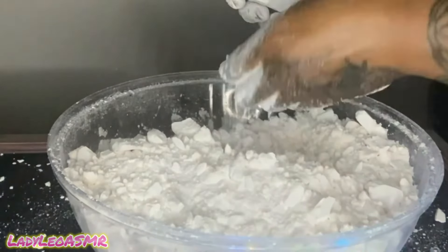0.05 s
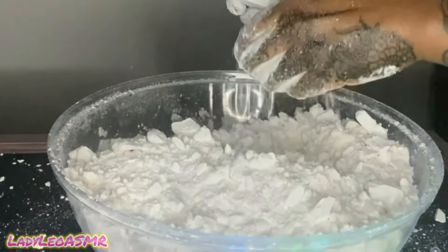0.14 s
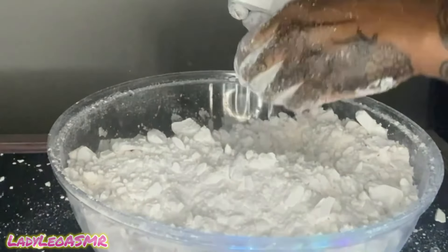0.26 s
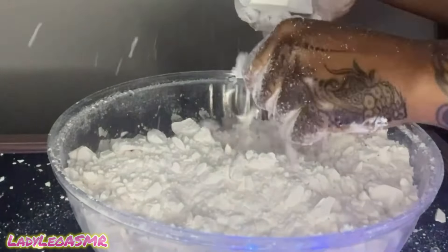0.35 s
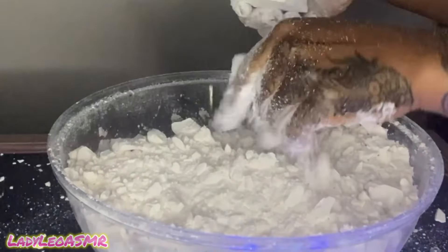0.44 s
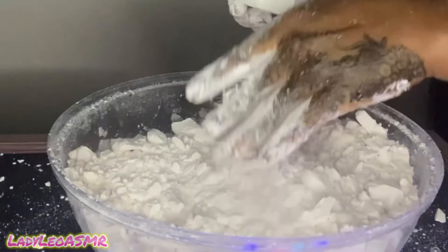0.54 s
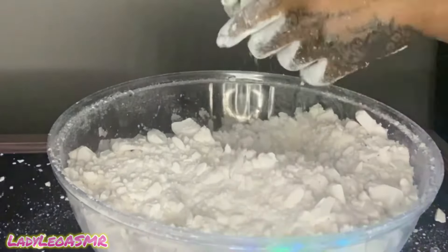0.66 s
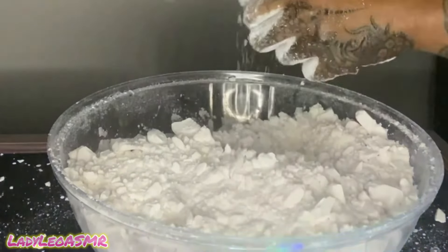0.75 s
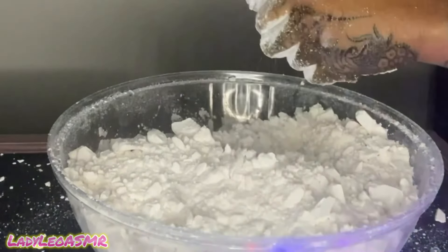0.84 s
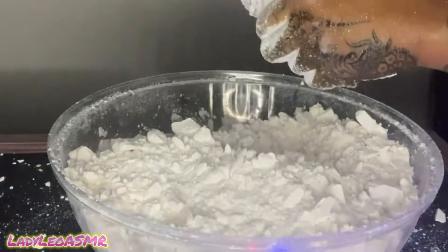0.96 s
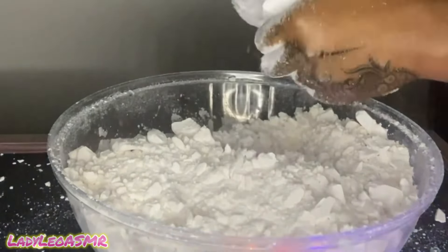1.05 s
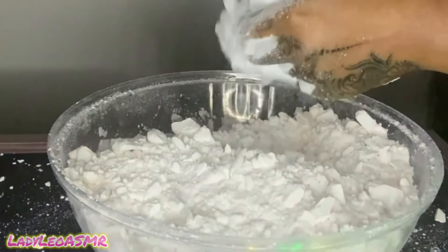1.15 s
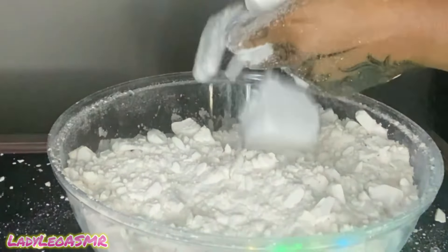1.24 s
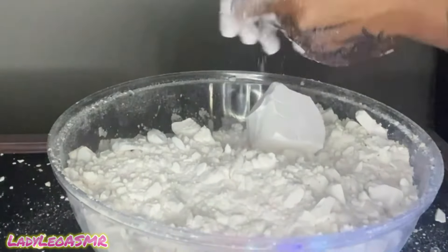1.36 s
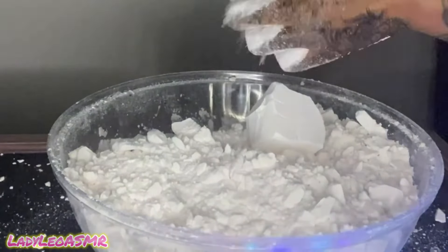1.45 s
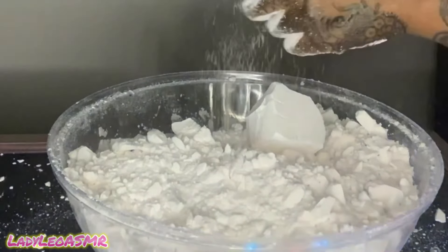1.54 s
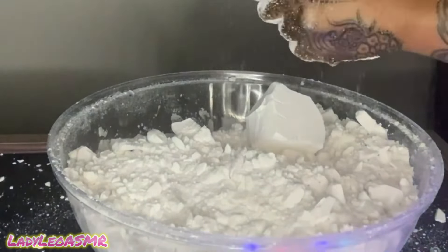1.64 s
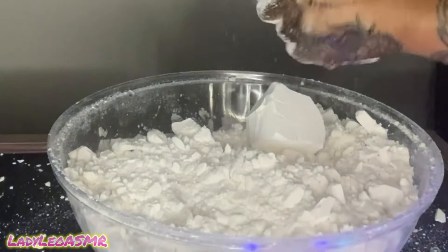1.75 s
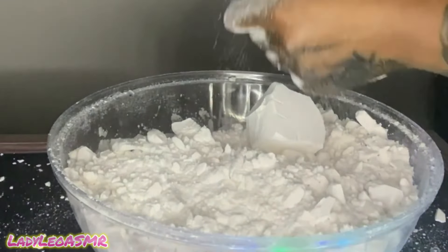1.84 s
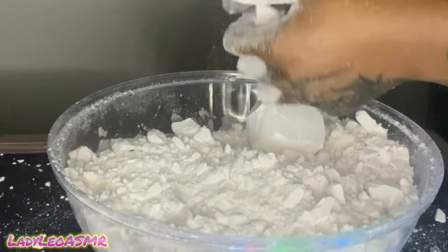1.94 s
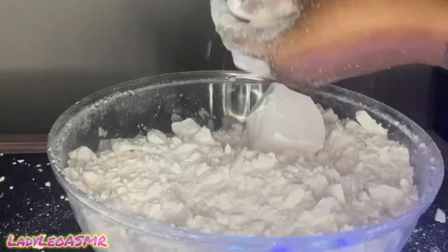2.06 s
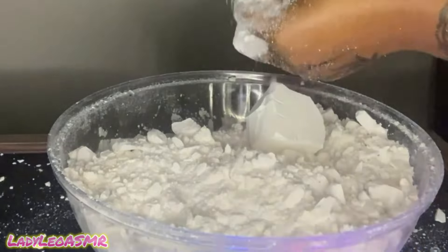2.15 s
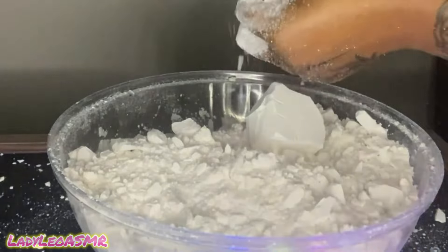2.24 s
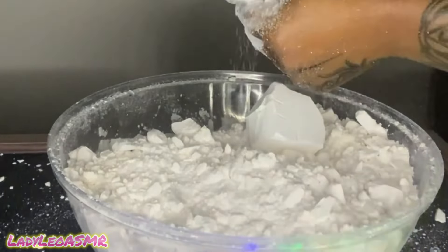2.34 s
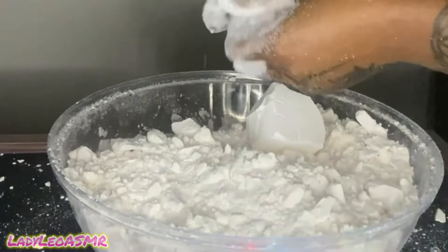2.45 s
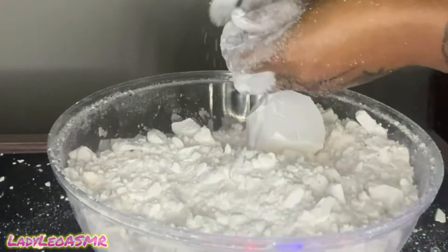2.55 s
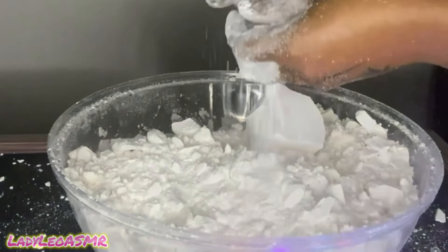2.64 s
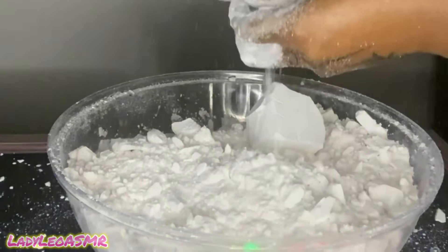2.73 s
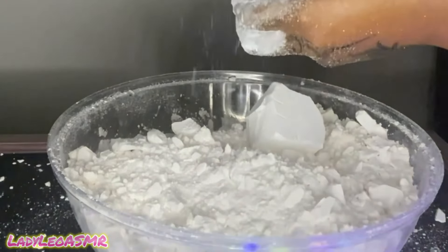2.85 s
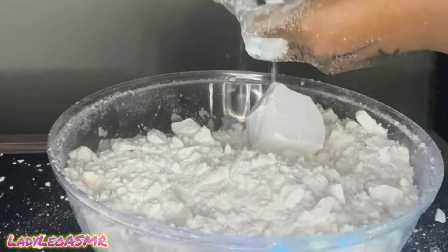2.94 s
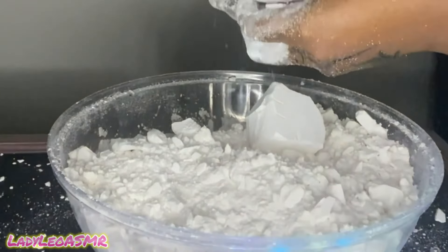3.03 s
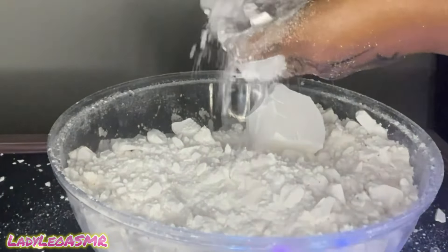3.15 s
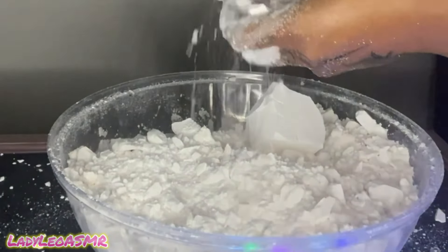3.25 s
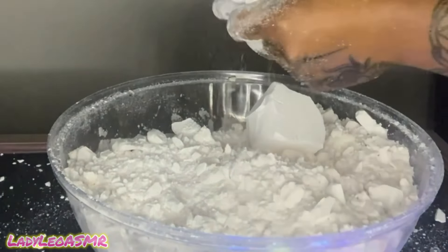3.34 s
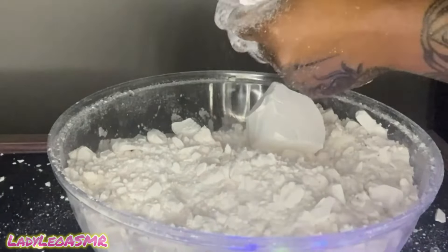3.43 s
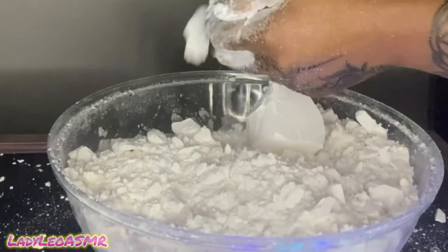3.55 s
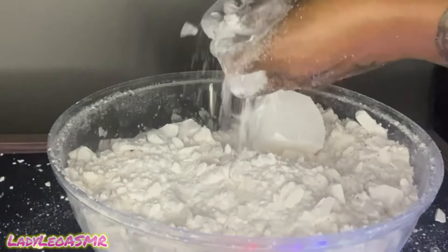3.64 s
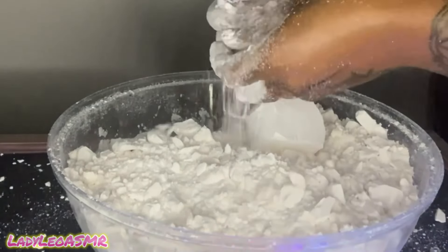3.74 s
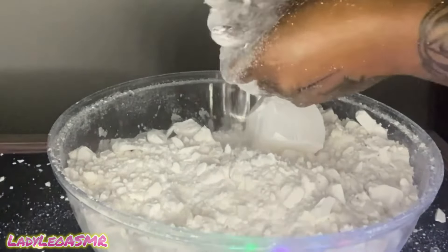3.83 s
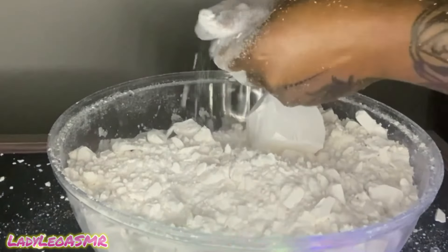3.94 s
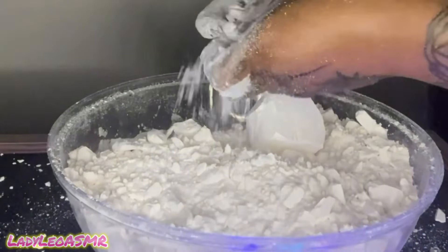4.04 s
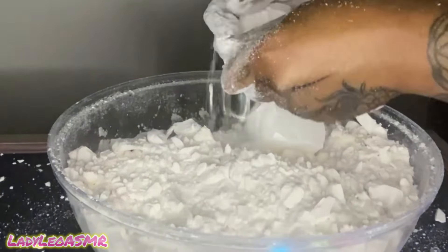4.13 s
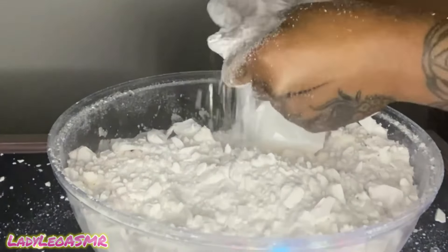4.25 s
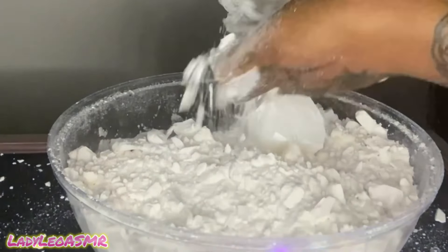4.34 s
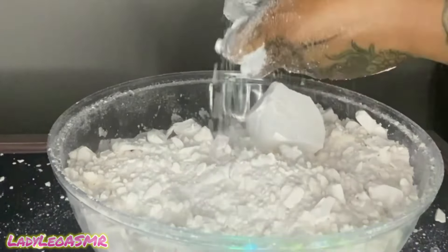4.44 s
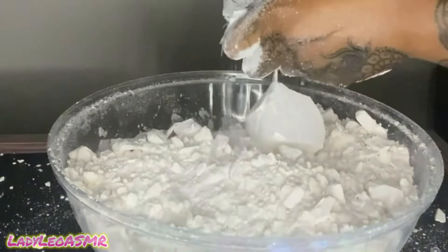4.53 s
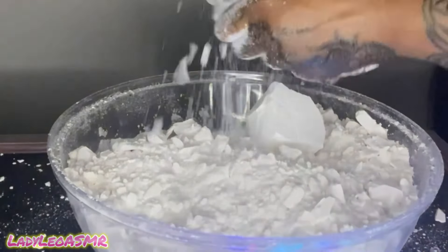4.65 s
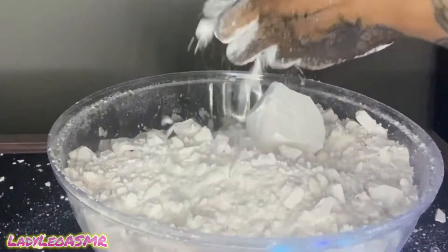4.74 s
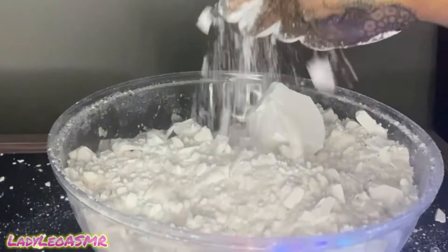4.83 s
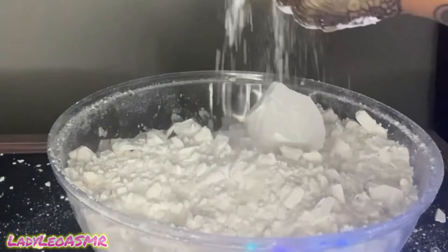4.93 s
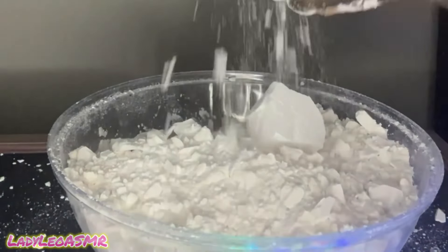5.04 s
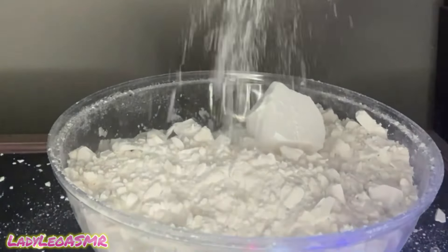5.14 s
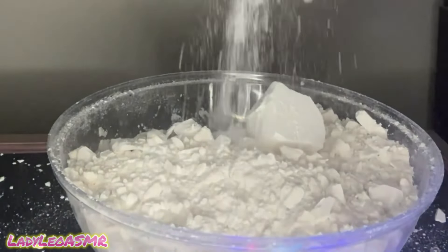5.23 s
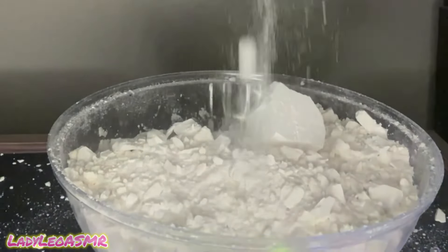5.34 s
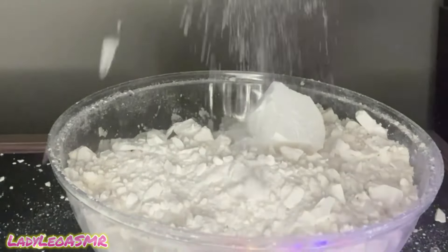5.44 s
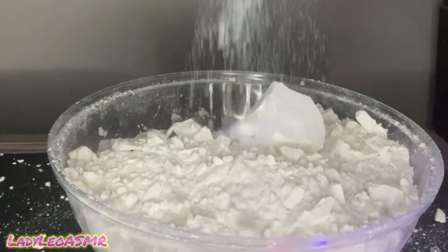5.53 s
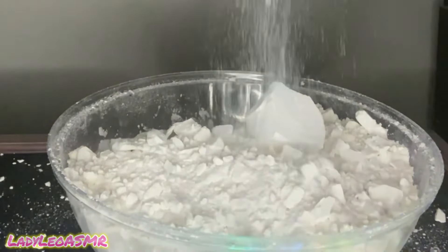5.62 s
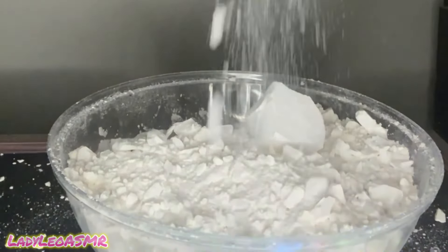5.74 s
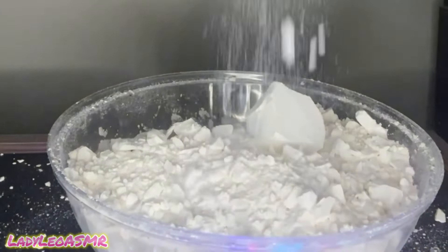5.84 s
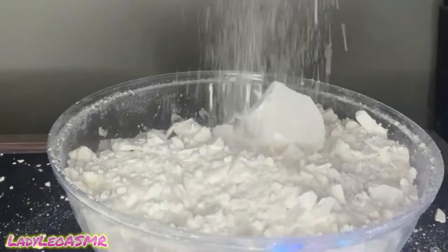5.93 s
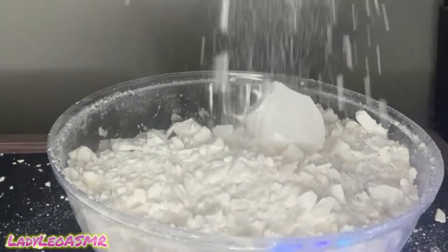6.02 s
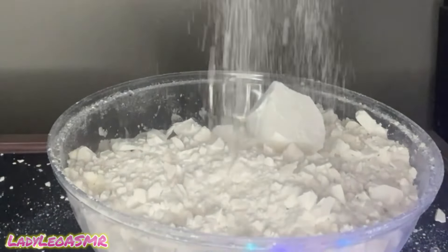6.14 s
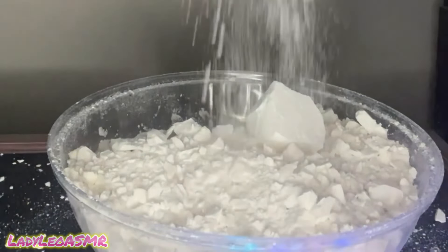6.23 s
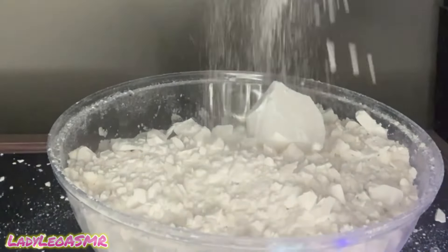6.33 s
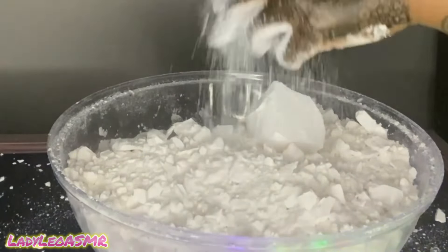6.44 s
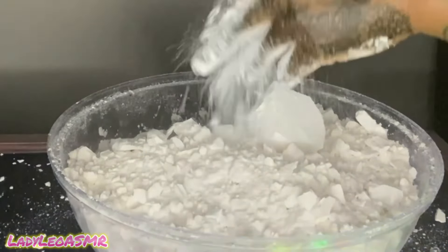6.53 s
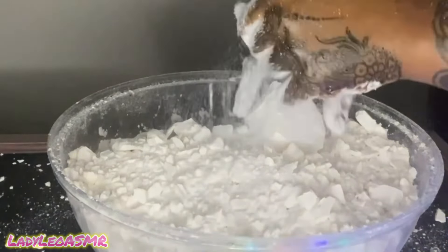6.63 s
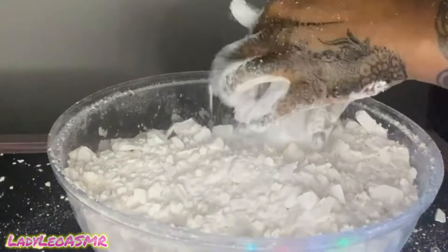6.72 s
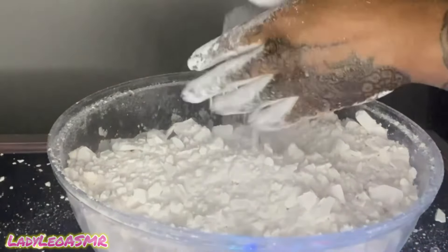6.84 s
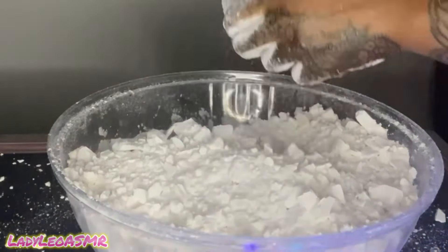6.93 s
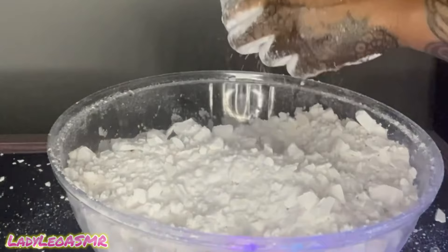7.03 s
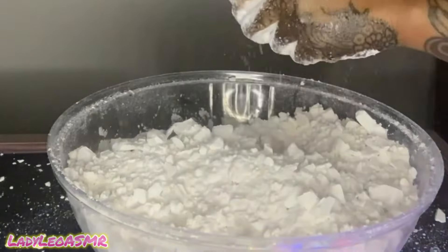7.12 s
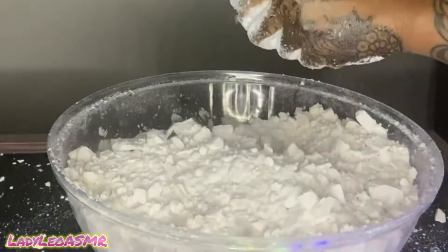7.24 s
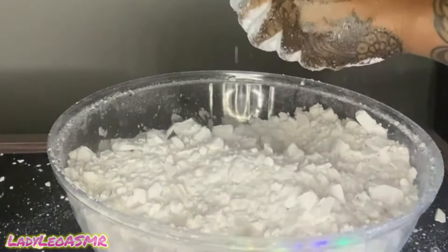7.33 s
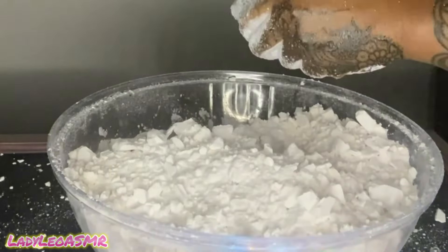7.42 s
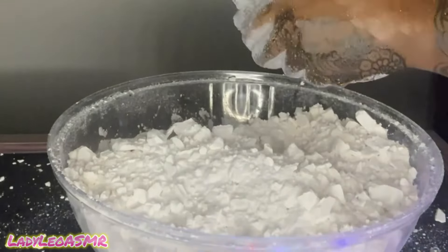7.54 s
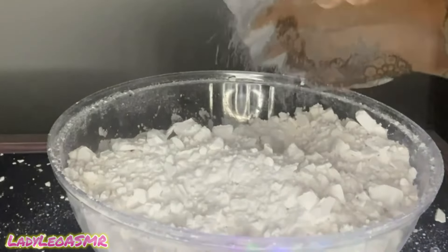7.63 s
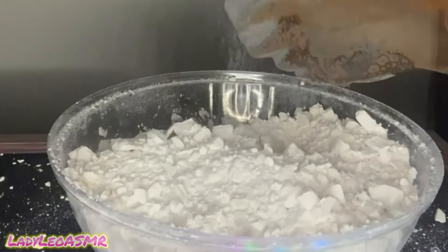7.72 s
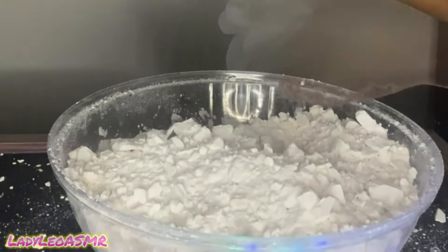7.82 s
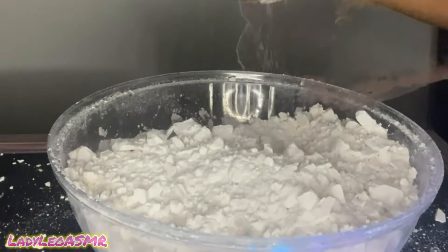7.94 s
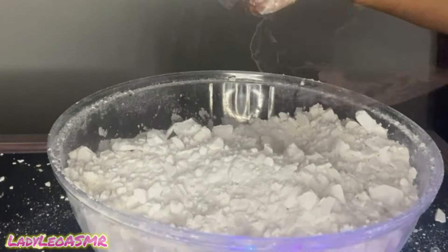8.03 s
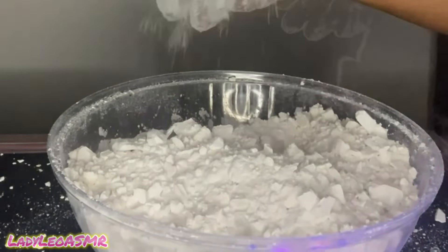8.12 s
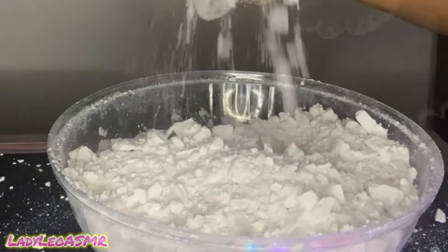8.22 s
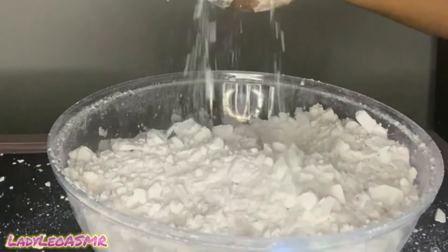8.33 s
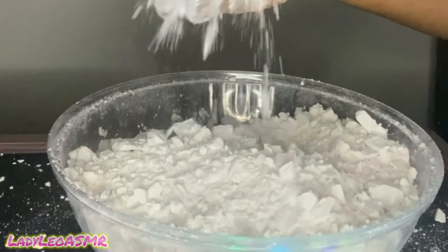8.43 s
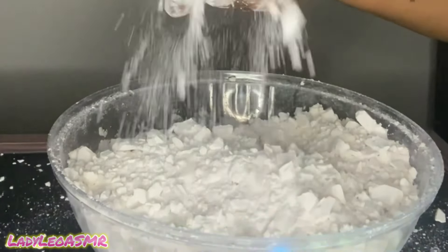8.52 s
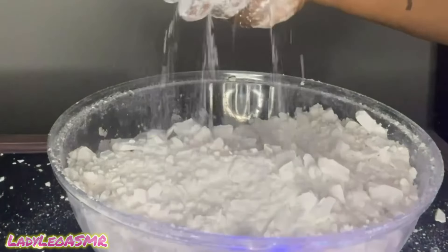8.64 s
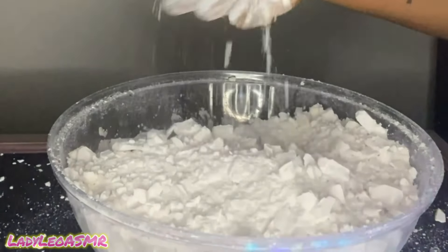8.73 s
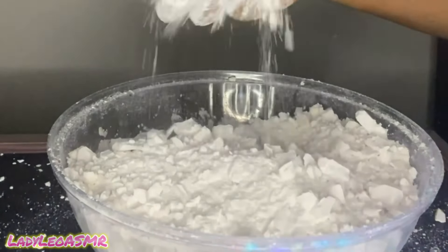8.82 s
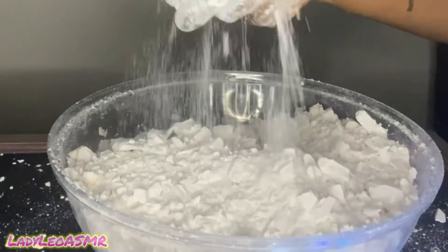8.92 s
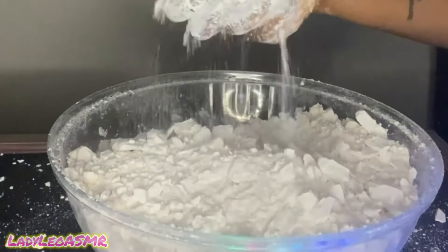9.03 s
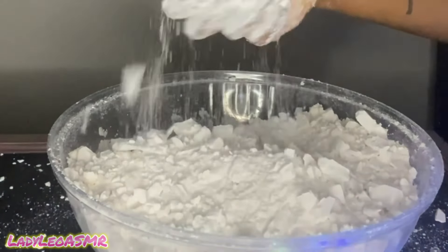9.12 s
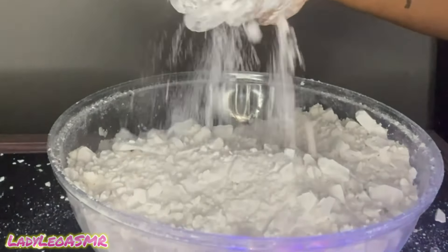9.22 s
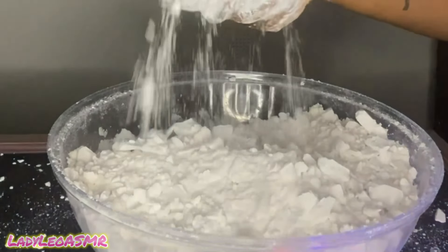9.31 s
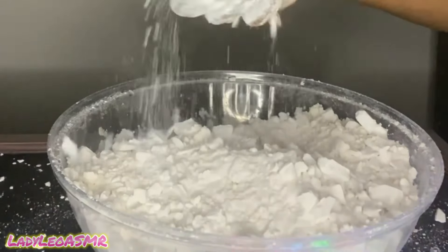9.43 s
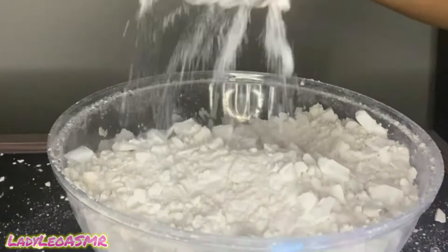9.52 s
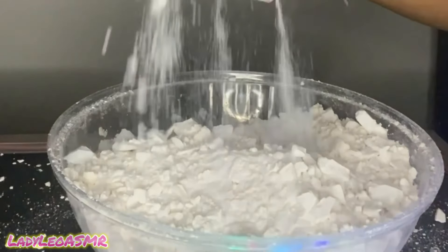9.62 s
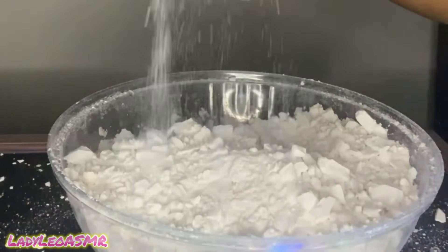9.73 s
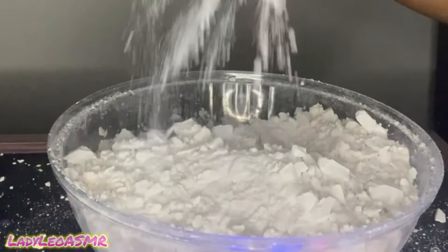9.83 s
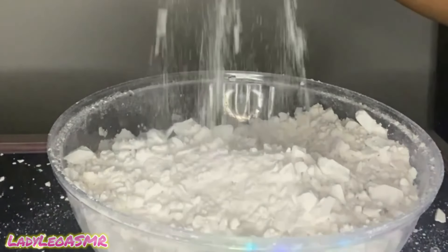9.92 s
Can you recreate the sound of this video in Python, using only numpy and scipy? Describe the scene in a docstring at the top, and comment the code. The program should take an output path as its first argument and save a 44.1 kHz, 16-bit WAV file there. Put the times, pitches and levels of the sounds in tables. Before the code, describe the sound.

Soft chalk blocks crack sharply and grind to powder between someone's hands, heard up close in a small room. Twice a block knocks hollowly in the plastic bowl below, and each time loud splintering snaps follow, then uneven crunching, a powdery hiss and the ticks of falling pieces. The two rounds are split by a brief quiet pause, with a low rumble underneath throughout.

```python
"""Crushing chalk over a bowl

Hands snap and crush soft chalk blocks over a plastic bowl, close to a stereo microphone in a small room.
Each break is a sharp crack with a short splintering tail; each squeeze grinds out grit and dust.
Pieces clink in the bowl, the bowl rings along and the room answers every crack.
A low rumble and a faint hiss lie under it all."""
import sys
import numpy as np
from scipy import signal
from scipy.fft import rfft, irfft
from scipy.io import wavfile

SR = 44100
rng = np.random.default_rng(int(sys.argv[2]) if len(sys.argv) > 2 else 0)


def generate_wav(sig):
    """Save sig (samples, or channels by samples) to the path in sys.argv[1] as 16-bit PCM at SR."""
    pcm = np.round(np.clip(np.atleast_2d(sig).T, -1, 1) * 32767).astype(np.int16)
    wavfile.write(sys.argv[1], SR, pcm)


N = 439677


def amp(db):
    """Turns decibels into a gain."""
    return 10 ** (np.asarray(db) / 20)


def lean_left(db):
    """Two gains that make the left side db louder than the right."""
    return amp([[db / 2], [-db / 2]])


def unit_power(x):
    """Scales a sound to an average power of 1."""
    return x / np.sqrt(np.mean(x ** 2) + 1e-20)


def at_hz(points, hz):
    """Reads between the rows of a table, giving every octave equal room."""
    points = np.array(points)
    return np.interp(np.log(hz), np.log(points[:, 0]), points[:, 1])


def drift(rate_hz):
    """A slow random wander, about 1 in size."""
    r = np.exp(-80 * np.pi * rate_hz / SR)
    slow = signal.lfilter([1], [1, -2 * r, r * r], rng.standard_normal(N // 40 + 2002))[2000:]
    return np.interp(np.arange(N) / 40, np.arange(len(slow)), unit_power(slow))


def filtered(x, hz, kind="low", order=2):
    """Keeps what lies below one pitch or, with "band", between two."""
    return signal.sosfilt(signal.butter(order, hz, kind, fs=SR, output="sos"), x)


def peak_filter(hz, width_hz):
    """The filter numbers for a resonance with gain 1 at its top."""
    r = np.exp(-np.pi * width_hz / SR)
    gain = (1 - r * r) / 2
    return [gain, 0, -gain], [1, -2 * r * np.cos(2 * np.pi * hz / SR), r * r]


def resonate(x, hz, width_hz):
    """Makes a sound ring near one pitch by passing it twice through a resonance."""
    b, a = peak_filter(hz, width_hz)
    return signal.lfilter(b, a, signal.lfilter(b, a, x))


# How alike the two sides sound. Each row: pitch in Hz, likeness (1 the same, -1 opposite).
STEREO_LIKENESS = [(25, 1), (60, 0.94), (130, 0.95), (300, 0.13), (640, -0.69), (1500, -0.4), (3000, -0.16),
                   (7000, 1), (11000, 0.067), (12400, -0.35)]

def colour(mid, side, spectrum, wide=1.0):
    """Mixes two noises into left and right and gives them the tone of a spectrum table."""
    size = N + 1323
    hz = np.maximum(np.fft.rfftfreq(size, 1 / SR), 1)
    alike = np.clip(1 - wide * (1 - at_hz(STEREO_LIKENESS, hz)), -1, 1)
    gain = amp(at_hz([(5, -80)] + spectrum + [(20000, -80)], hz))
    mid = np.sqrt(1 + alike) * rfft(mid, size)
    side = np.sqrt(1 - alike) * rfft(side, size)
    return unit_power(irfft(gain * np.array([mid + side, mid - side]))[:, :N])


# The rumble's tone. Each row: pitch in Hz, relative level in dB.
RUMBLE_TONE = [(14, -35.5), (25, -14.5), (45, -4.5), (60, 1), (80, -8.5), (110, -4.5), (180, -11),
               (290, -17), (370, -23.5), (500, -58.5)]
# The rumble's loudness. Each row: time in seconds, level in dB.
RUMBLE_LEVELS = [(0.0, -48.5), (1.02, -49.5), (1.14, -41.5), (1.28, -42), (1.36, -36.5), (1.55, -50),
                 (1.89, -48), (4.63, -48), (4.77, -45), (5.66, -48.5), (5.86, -43.5), (6.86, -48.5),
                 (8.52, -37), (8.83, -40), (9.97, -40)]

def rumble():
    """Low noise that swells now and then and wavers a little."""
    level_db = np.interp(np.arange(N) / SR, *np.transpose(RUMBLE_LEVELS)) + 0.8 * drift(5)
    return amp(level_db) * colour(*rng.standard_normal((2, N)), RUMBLE_TONE)


# The hiss's tone. Each row: pitch in Hz, relative level in dB.
HISS_TONE = [(250, -17), (400, 12), (1200, 5), (2000, -0.5), (3300, -4), (5500, -10.5), (8000, -20),
             (11800, -10), (12600, -50.5)]

def hiss(level_db=-57.5):
    """Faint, steady background noise."""
    return amp(level_db) * colour(*rng.standard_normal((2, N)), HISS_TONE)


def grains(per_s, spread_db, smooth):
    """Clumps of random clicks, very uneven in size, over a share of smooth noise."""
    sizes = amp(spread_db * np.minimum(rng.exponential(1, N), 5)) * rng.choice([-1, 1], N)
    clicks = rng.random(N) < per_s * amp(4.0 * drift(25)) / SR
    return unit_power(sizes * clicks) + smooth * rng.standard_normal(N)


# The hand squeezes or rubs. Each row: start in seconds, hold in seconds, grit in dB, dust in dB.
SQUEEZE_MOVES = [(0.21, 0.0056, -44, -50), (0.351, 0.067, -48, -45.5), (0.523, 0.11, -56.5, -47),
                 (1.154, 0.0092, -39, -46.5), (1.22, 0.064, -54, -55), (1.368, 0.031, -65, -48.5),
                 (1.507, 0.047, -68, -44.5), (1.857, 0.0062, -29.5, -45), (2.007, 0.1, -97, -47.5),
                 (2.176, 0.041, -53.5, -40.5), (2.289, 0.17, -41, -53), (2.55, 0.04, -52.5, -44.5),
                 (2.746, 0.012, -51, -40), (2.97, 0.013, -39, -40.5), (3.058, 0.055, -30.5, -38.5),
                 (3.308, 0.02, -36.5, -32), (3.409, 0.085, -40, -40.5), (3.7, 0.084, -47.5, -47),
                 (3.842, 0.094, -42, -44), (4.189, 0.14, -45, -44.5), (4.466, 0.26, -53.5, -49),
                 (4.673, 0.027, -31.5, -40), (4.921, 0.097, -37.5, -44.5), (5.147, 0.17, -49.5, -49),
                 (5.393, 0.077, -36, -37.5), (5.574, 0.042, -40, -38.5), (5.695, 0.26, -49.5, -47),
                 (6.045, 0.067, -45.5, -38), (6.193, 0.03, -45.5, -45.5), (6.331, 0.16, -51.5, -44),
                 (6.668, 0.19, -71.5, -52.5), (6.991, 0.011, -67, -46.5), (7.69, 0.007, -39.5, -48),
                 (7.917, 0.033, -37.5, -43), (8.007, 0.13, -39, -61), (8.204, 0.12, -41.5, -42.5),
                 (8.374, 0.045, -39.5, -37), (8.483, 0.069, -48, -57), (8.601, 0.19, -38.5, -42.5),
                 (8.818, 0.028, -46.5, -51), (8.954, 0.069, -46, -44), (9.092, 0.043, -37, -44),
                 (9.222, 0.072, -46.5, -44), (9.327, 0.12, -40.5, -40.5), (9.546, 0.11, -44, -52.5),
                 (9.724, 0.11, -47.5, -44), (9.909, 0.082, -43, -47)]

def squeezing(layer, rest_db, rise_db_per_s=370, fall_db_per_s=202):
    """Loudness of grit or dust: each squeeze swells, holds and dies away over a faint trickle."""
    t, power = np.arange(0, N + 64, 64) / SR, amp(2 * rest_db)
    for start, hold, grit_db, dust_db in SQUEEZE_MOVES:
        db = grit_db if layer == "grit" else dust_db
        before, after = np.maximum(start - t, 0), np.maximum(t - start - hold, 0)
        power = power + amp(2 * (db - rise_db_per_s * before - fall_db_per_s * after))
    return np.interp(np.arange(N) / SR, t, np.sqrt(power))


# The note of the hollow between the hands. Each row: time in seconds, pitch in Hz.
GRIP_PITCHES = [(0.0, 1303), (0.19, 3270), (0.36, 1520), (0.53, 3040), (1.25, 1710), (1.77, 1400),
                (2.25, 3540), (2.33, 2120), (2.64, 3190), (4.8, 2142), (4.89, 1140), (5.0, 2250),
                (6.58, 2140), (7.53, 1646), (8.39, 2900), (9.77, 1754), (9.97, 2100)]

def cupped_hands(x, width_share=0.4, peak_db=-0.5):
    """The hollow of the hands adds a resonance that moves as the grip shifts."""
    peak, state, block = np.zeros_like(x), np.zeros((2, 2)), 256
    for i in range(0, N, block):
        hz = np.interp(i / SR, *np.transpose(GRIP_PITCHES))
        b, a = peak_filter(hz, width_share * hz)
        peak[:, i:i + block], state = signal.lfilter(b, a, x[:, i:i + block], zi=state)
    return unit_power(x + amp(peak_db) * peak)


# The pitch in Hz of each size of crumb, from big to small.
CRUMB_PITCHES = [450, 750, 1150, 1500, 1850, 2000, 2150, 2350, 2900, 3400, 4000]

def crumbs(db_per_octave=-4):
    """Crumbs strike the heap at random and ring briefly; smaller ones are higher and weaker."""
    hits = grains(per_s=230, spread_db=2.1, smooth=0)
    sizes = rng.integers(0, len(CRUMB_PITCHES), N)
    left_db = rng.normal(0, 4.0, len(CRUMB_PITCHES))
    out = np.zeros((2, N))
    for k, hz in enumerate(CRUMB_PITCHES):
        ticks = resonate(hits * (sizes == k) + 1e-18, hz, 0.15 * hz)
        out += ticks * amp(db_per_octave * np.log2(hz / 2000)) * lean_left(left_db[k])
    return unit_power(out)


# The grit's tone. Each row: pitch in Hz, relative level in dB.
GRIT_TONE = [(300, -13.5), (700, -4), (1200, -3), (1650, -4.5), (2150, 0), (2650, -6), (4000, -3.5),
             (6000, -7)]

def grit(crumb_db=-17):
    """Coarse grains grind inside the hands while single crumbs drop."""
    grind = colour(grains(1200, 4.0, 1.0), grains(1200, 3.3, 0.7), GRIT_TONE, wide=0.7)
    return squeezing("grit", rest_db=-70) * (cupped_hands(grind) + amp(crumb_db) * crumbs())


# The dust's tone. Each row: pitch in Hz, relative level in dB.
DUST_TONE = [(2500, -17.5), (4500, -18), (6500, -14), (9000, -14.5), (11600, -14.5), (12400, -14),
             (16000, -17.5)]

def dust(flicker_db=3.2):
    """Fine powder hisses; the rubbing fingers shift, so each band swells and fades on its own."""
    powder = colour(grains(2500, 2.7, 0.75), grains(2500, 3.0, 0.8), DUST_TONE, wide=1.5)
    edges_hz = np.geomspace(2500, 17000, 6)
    # flipping every other band lets the bands join smoothly
    patchy = sum((-1) ** k * amp(flicker_db * drift(15)) * filtered(powder, band, "band")
                 for k, band in enumerate(zip(edges_hz, edges_hz[1:])))
    return squeezing("dust", rest_db=-63) * unit_power(patchy)


def splinters(t, fade_s, soft):
    """One sharp fracture, then many tiny breaks; also returns two smooth noises for the echoes."""
    noise = rng.standard_normal((3, len(t)))
    noise[0] *= np.abs(noise[0]) ** 0.49   # makes it spiky
    noise[0] *= amp(-60 * t / fade_s)
    swell_s = (0.04 if soft else 0.012) * fade_s
    noise[0] *= 1 - np.exp(-t / swell_s)
    noise = filtered(noise, 11800, order=10)
    if not soft:
        noise[0, 0] += 0.055 / fade_s   # the shorter the break, the harder its first click
    return noise


# The room's answer to a crack's ring, treble and thud. Each row: relative level in dB,
# fade time in seconds (a fade time is how long a 60 dB drop takes), stereo spread in dB.
ROOM_ANSWERS = [(10, 0.26, -2), (10.5, 0.15, -4), (12.5, 0.3, 0.5)]

def room_echo(t, part, mid, side, crack_fade_s, first_echo_s=0.0016):
    """Dense echoes, new for each crack as the hands move; longer splintering feeds the room more."""
    room_db, fade_s, side_db = ROOM_ANSWERS[part]
    echoes = unit_power(mid) + amp(side_db) * unit_power(side) * [[1], [-1]]
    arrival = np.clip(t / first_echo_s - 1, 0, 1)
    fed_db = -26.5 + 6 * np.log2(crack_fade_s / 0.02)
    return echoes * lean_left(2.4) * arrival * amp(fed_db + room_db - 60 * t / fade_s)


# Chalk breaks. Each row: start in seconds, level in dB, ring pitch in Hz,
# treble and thud in dB compared with the ring, fade time in seconds.
CHALK_BREAKS = [(0.189, -16, 2820, -2, -11, 0.026), (0.207, -20, 2370, 8, -7, 0.0092),
                (0.31, -22.5, 2880, -6, -5.5, 0.027), (0.327, -25, 1560, 5, 0.5, 0.024),
                (0.364, -31, 3200, -10, 5.5, 0.014), (0.597, -27.5, 2500, 8, -7.5, 0.013),
                (1.328, -21.5, 2800, 2, -6, 0.022), (1.82, -2, 1580, -1.5, -9, 0.017),
                (2.165, -31.5, 2570, 6.5, -14, 0.027), (2.302, -19.5, 3150, 1.5, -18, 0.012),
                (2.348, -26, 3000, -24, -15, 0.16), (2.358, 1, 1910, -7, -11, 0.012),
                (2.65, -40, 3700, 7, -34, 0.048), (2.737, -26.5, 2330, 4, -45, 0.025),
                (2.938, -19, 2730, -11.5, -10, 0.044), (2.963, -20.5, 2030, -3, -34, 0.025),
                (3.012, -5, 3220, -9, -11, 0.012), (3.043, -8.5, 2940, -2, -21, 0.01),
                (3.068, -10.5, 3040, -22, -27, 0.067), (3.268, -30.5, 3300, 2, -17, 0.062),
                (3.298, -19, 3160, -2, -45, 0.018), (3.317, -17, 3080, -15, -39, 0.023),
                (3.369, -29, 2200, 11, -27, 0.0092), (3.418, -25.5, 1630, 9.5, -10, 0.01),
                (3.451, -15.5, 3390, 3, -36, 0.0026), (3.482, -21.5, 1830, 4, -12.5, 0.021),
                (3.693, -28, 2080, 0, -7, 0.019), (3.832, -22, 3280, 7, -25, 0.0054),
                (3.881, -37, 2380, 17, -23, 0.0089), (3.901, -38, 1890, 8.5, -4.5, 0.091),
                (4.211, -18, 3000, 1.5, -5, 0.018), (4.221, -28, 3830, 11, 2.5, 0.017),
                (4.578, -12.5, 3360, -4, -10.5, 0.012), (4.637, -30, 3500, 0, -22, .005),
                (4.651, -8.5, 2700, -26, -17, 0.0097), (4.658, -10, 1600, -2.5, -3, 0.012),
                (4.91, -13, 1860, -16, 3, 0.014), (5.001, -25, 3560, 10, -1, 0.015),
                (5.182, -18, 2330, 1, -19, 0.0057), (5.391, -10, 1900, 5.5, -7, 0.015),
                (6.876, -36, 3340, 12, -11, 0.0061), (6.957, -40.5, 3940, 10.5, -34, 0.0039),
                (7.876, -4.5, 1780, 1.5, -12.5, 0.011), (7.96, -7.5, 2450, -0.5, -41, 0.0087),
                (7.966, -3.5, 3920, -3, -13, 0.011), (8.05, -5.5, 2070, -44, -16, 0.008),
                (8.2, -14, 2830, -0.5, -19.5, 0.0081), (8.247, -33, 2340, -24, -25, 0.0095),
                (8.287, -34, 1200, -13, -13, 0.012), (8.346, -16, 3800, 0.5, -4, 0.014),
                (8.376, -27, 3000, 2, -8, 0.008), (8.385, -28, 3900, 5, -25, .006),
                (8.458, -25.5, 2800, -17, -12, 0.0072), (8.487, -27, 3800, -19, -7.5, 0.013),
                (8.61, -29.5, 1980, 5.5, -23, 0.013), (8.629, -29.5, 2300, 13, -16, 0.0051),
                (8.638, -18.5, 2020, -6, -9, 0.0066), (8.736, -10, 3400, 3.5, -9.5, 0.0071),
                (8.956, -27.5, 2620, -8, -5, 0.017), (9.076, -25, 1640, 2.5, -6, 0.045),
                (9.177, -30.5, 1420, 0, -18, 0.01), (9.198, -31.5, 3500, 8, -25, .004),
                (9.338, -23, 2200, -3, -8.5, 0.028), (9.501, -26.5, 2000, 2.5, -36, 0.01),
                (9.633, -24, 3280, 2.5, -5.5, 0.01), (9.747, -32.5, 1080, -17, -5, 0.019)]
# A whole block knocks hollow against the bowl. Each row: the same as for a break.
BLOCK_KNOCKS = [(1.114, -18, 1770, -12.5, 1.1, 0.073), (7.656, -26, 1660, -9.5, 2.9, 0.12)]
# Falling pieces clink in the bowl. Each row: the same as for a break, without the thud.
PIECE_CLINKS = [(0.614, -40.5, 2200, -8, .02), (3.427, -28, 1600, -3, .008),
                (4.542, -19, 2240, -0.5, 0.024), (5.047, -33, 2070, -4, 0.076),
                (5.273, -26.5, 2250, -22, 0.01), (5.331, -27.5, 2060, 3, 0.028),
                (5.56, -22, 2000, -5, 0.02), (5.683, -28.5, 2150, -2, 0.015),
                (5.722, -24.5, 2320, 9.5, 0.01), (5.8, -23.5, 2110, -10, 0.014),
                (5.947, -34, 2330, 8, 0.0078), (6.048, -23.5, 1990, 6, 0.013),
                (6.139, -32.5, 2200, 11, 0.0093), (6.173, -28, 2070, -26, 0.016),
                (6.244, -27, 2020, -6.5, 0.027), (6.378, -33, 2230, 10.5, 0.012),
                (6.399, -38, 1620, -15, 0.0081), (6.422, -24, 2250, 3, 0.012), (6.458, -34, 2020, 7, 0.013),
                (7.286, -41.5, 1820, 2, 0.042), (8.045, -10, 2160, 6.5, 0.0054),
                (8.07, -16, 2230, -33, 0.0042), (8.21, -20.5, 2280, 11, 0.0049),
                (8.751, -22, 2290, 0, 0.0071), (9.245, -31.5, 1960, -10, 0.013),
                (9.386, -18.5, 2150, 6, 0.007), (9.778, -34.5, 1810, 12.5, 0.0067)]

def cracks(clink_thud_db=-11.5, knock_top_hz=2800):
    """Breaks, knocks and clinks: the chunk rings, its edges fizz, the hand thuds, the room answers."""
    t, out = np.arange(int(0.3 * SR)) / SR, np.zeros((2, N + SR))
    clinks = [(*row[:4], clink_thud_db, row[4]) for row in PIECE_CLINKS]
    # each kind of hit: its rows, how wide its ring is, whether it is soft and dull
    kinds = [(CHALK_BREAKS, 0.87, False), (BLOCK_KNOCKS, 0.35, True), (clinks, 0.26, False)]
    for rows, width, soft in kinds:
        for start, level_db, hz, treble_db, thud_db, fade_s in rows:
            burst = splinters(t, fade_s, soft)
            spread = 1 + width / 2
            ring = filtered(burst, [hz / spread ** 1.47, hz * spread], "band")
            treble = filtered(burst, [3600, 7600], "band")
            thud = filtered(burst, [330, 1600], "band")
            if soft:
                ring, thud = filtered(ring, knock_top_hz), filtered(thud, knock_top_hz)
            i = round(start * SR)
            parts = [(ring, 0), (treble, treble_db), (thud, thud_db)]
            for part, ((direct, mid, side), db) in enumerate(parts):
                direct = direct / np.abs(direct).max() * lean_left(2.5)
                echo = room_echo(t, part, mid, side, fade_s)
                out[:, i:i + len(t)] += amp(level_db + db) * (direct + echo)
    return out[:, :N]


# The notes of the bowl wall. Each row: pitch in Hz, width in Hz, gain in dB.
BOWL_NOTES = [(1245, 250, -11.5), (1742, 70, -9.5), (1926, 70, -8), (2158, 54, -5), (2400, 41, -2.5),
              (3340, 320, -3.5)]

def bowl(x):
    """Whatever breaks above the bowl sets its wall ringing."""
    return x + sum(amp(db) * signal.lfilter(*peak_filter(hz, width), x) for hz, width, db in BOWL_NOTES)


# A chunk or the bowl wall rings on after a blow. Each row: start in seconds, level in dB,
# pitch in Hz, width in Hz (widened if under the minimum), fade time in seconds.
AFTER_RINGS = [(0.189, -39, 2540, 250, 0.44), (1.116, -28, 1780, 350, 0.39), (1.114, -23.5, 475, 300, 0.26),
               (1.114, -37.5, 4100, 700, 0.27), (1.822, -24, 1790, 300, 0.3),
               (2.359, -17.5, 3140, 350, 0.13), (3.073, -17, 2530, 700, 0.3), (3.32, -32, 3470, 400, 0.18),
               (3.495, -33.5, 1800, 200, 0.19), (4.545, -33, 2160, 250, 0.48),
               (4.911, -7.5, 840, 151, 0.027), (5.56, -26.5, 1837, 150, 0.27), (5.8, -25, 2030, 100, 0.04),
               (6.185, -36, 570, 394, 0.18), (6.244, -33.5, 1870, 200, 0.16),
               (6.422, -34, 2170, 120.6, 0.17), (7.658, -25.5, 1810, 348, 0.38),
               (7.658, -27, 550, 250, 0.32), (9.53, -40.5, 1900, 900, 0.6)]

def rings(min_width_hz=150, attack_s=0.0014):
    """Shaken by splinters, a resonance sounds on and fades; chalk and plastic never ring purely."""
    t, out = np.arange(int(0.4 * SR)) / SR, np.zeros((2, N + SR))
    for start, db, hz, width_hz, fade_s in AFTER_RINGS:
        mid, side = rng.standard_normal((2, len(t)))
        shaking = np.array([mid + 0.47 * side, mid - 0.5 * side])
        tone = unit_power(resonate(shaking, hz, max(width_hz, min_width_hz)))
        i = round(start * SR)
        out[:, i:i + len(t)] += tone * amp(db - 60 * t / fade_s) * np.minimum(t / attack_s, 1)
    return out[:, :N]


# Lumps land in or jolt the bowl. Each row: start in seconds, level in dB, pitch in Hz, fade in seconds.
BOWL_THUMPS = [(0.461, -36.5, 350, 0.05), (1.118, -25.5, 203, 0.15), (1.352, -27, 68, 0.18),
               (6.19, -30.5, 267, 0.095), (7.659, -27.5, 207.4, 0.11)]

def thumps():
    """The bowl bottom swings a few slow cycles."""
    out = np.zeros(N)
    for start, db, hz, fade_s in BOWL_THUMPS:
        age = np.maximum(np.arange(N) / SR - start, 0)
        out += amp(db - 60 * age / fade_s) * np.sin(2 * np.pi * hz * age)
    return out


# Powdery fingers slide. Each row: start in seconds, length in seconds, level in dB, pitch in Hz.
FINGER_SLIDES = [(0.689, 0.096, -49.5, 7500), (1.48, 0.16, -60, 7000), (6.77, .1, -57, 6440),
                 (2.001, 0.13, -46.5, 6700), (2.53, 0.071, -43, 6750), (8.39, 0.07, -35.5, 5330),
                 (9.2, 0.057, -39, 8150)]

def swishes(width_hz=1200):
    """A soft band of hiss swells and fades as one finger slides over another."""
    out = np.zeros((2, N))
    for start, length, db, hz in FINGER_SLIDES:
        i, swell = round(start * SR), np.hanning(int(length * SR))
        noise = rng.standard_normal((2, SR // 4))[:, :len(swell)]
        out[:, i:i + len(swell)] += amp(db) * swell * unit_power(resonate(noise, hz, width_hz))
    return out


def scene():
    """Cracks and crumbling chalk over the bowl, with rumble and hiss underneath."""
    crumbling = bowl(grit()) + dust()
    background = rumble() + hiss()
    cracking = bowl(cracks())
    handling = rings() + thumps() + swishes()
    return cracking + (crumbling + background + handling) * lean_left(0.9)


def record(dry, rolloff_hz=14500, cutoff_hz=16500):
    """The microphone softens the top octave, peaks stop at full scale and the very top is cut."""
    clipped = np.clip(filtered(dry, rolloff_hz), -1, 1)
    return signal.sosfilt(signal.cheby2(12, 70, cutoff_hz, fs=SR, output="sos"), clipped)


dry = scene()
out = record(dry)
generate_wav(out)
```